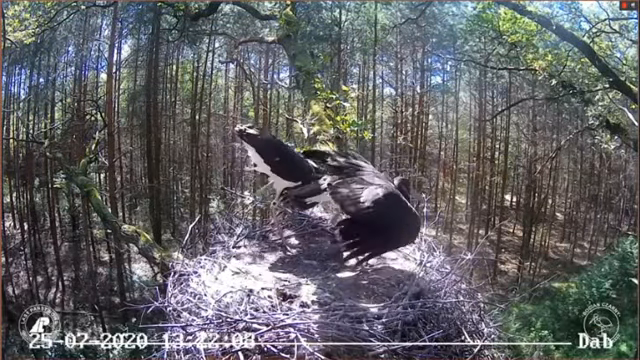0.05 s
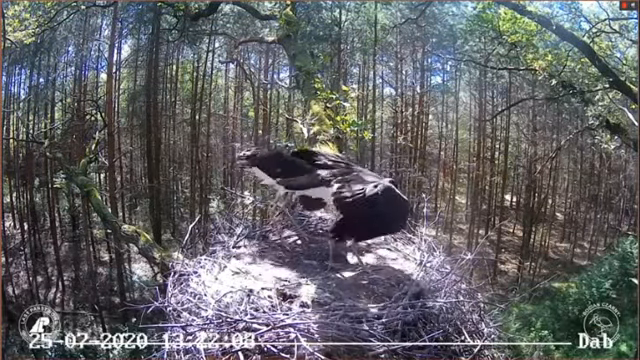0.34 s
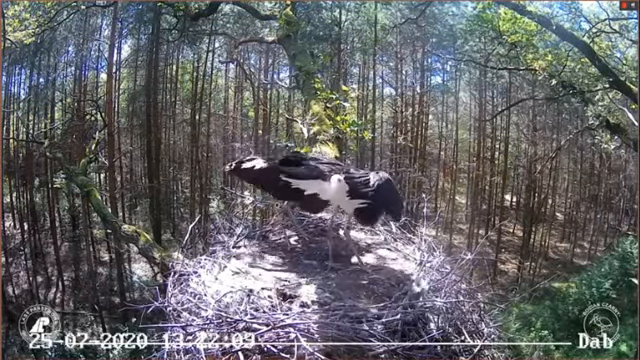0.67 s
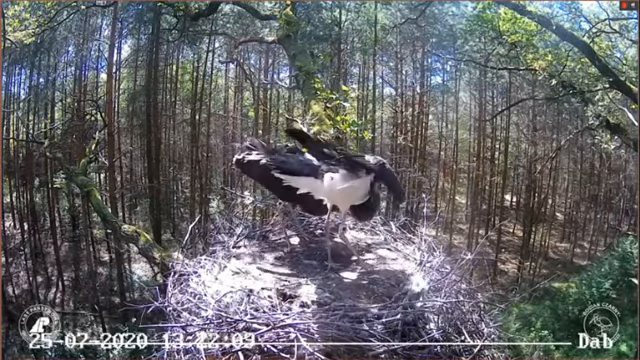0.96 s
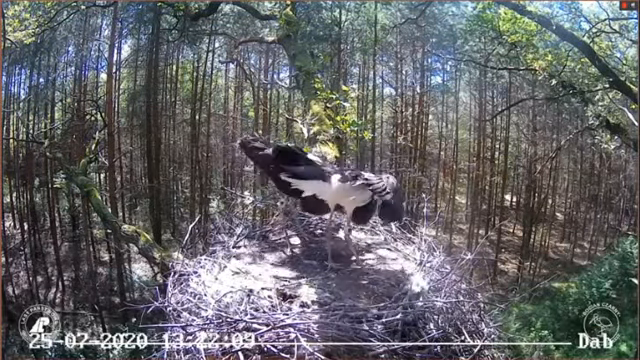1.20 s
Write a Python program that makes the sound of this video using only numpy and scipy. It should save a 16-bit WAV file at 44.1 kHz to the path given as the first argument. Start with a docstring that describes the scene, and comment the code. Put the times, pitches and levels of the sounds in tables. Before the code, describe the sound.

Harsh stork chatter, made of quick squeals, squeaks and breathy hiss, sounds from a forest nest. Soft outdoor hush and barely audible distant birds come first, then two bouts of calling, near the microphone and with a slight echo.

```python
"""Harsh chatter at a stork's nest: two bouts of about ten syllables a second, after a quiet forest opening.
Each syllable falls from thin squeaks through a squeal near 3 kHz, which breaks into subharmonics at a half
and a third of its pitch, sometimes down to a croak of pulses filtered by the throat. Turbulent air hisses
in the resonances of throat and bill. Feet shift on the nest, small birds call far off, and scattering
from the trees gives a short echo."""
import sys
import numpy as np
from scipy import signal
from scipy.fft import rfft, irfft
from scipy.io import wavfile

SR = 44100
rng = np.random.default_rng(int(sys.argv[2]) if len(sys.argv) > 2 else 0)


def dump(signal):
    """Clip the signal to [-1, 1] and save it as 16-bit WAV at the path in sys.argv[1]."""
    limited = np.clip(np.atleast_2d(signal).T, -1, 1)
    pcm = np.round(limited * 32767).astype(np.int16)
    wavfile.write(sys.argv[1], SR, pcm)


N = 176400
TIME = np.arange(N) / SR

# spectrum of the forest air: (frequency [Hz], spectral density [dB])
FOREST_SPECTRUM = [(30, -29.5), (75, -26.5), (150, -9.5), (400, -5), (750, 0.5), (1000, -3.5),
                   (1200, -12.5), (1550, -11.5), (3500, -18.5), (4900, -11.5), (5800, -24)]
# calls of small, distant birds: (middle [s], length [s], pitch [Hz], level [dB])
FAR_CALLS = [(0.073, 0.083, 5100, -68.5), (0.871, 0.069, 4740, -67), (1.482, .02, 4760, -64),
             (1.619, 0.075, 5000, -63.5)]
# reflections from nest and trunk: (delay [s], level [dB])
REFLECTIONS = [(.0031, -21.5), (.0068, -19.5)]
# stereo balance: (frequency [Hz], left minus right [dB])
BALANCE = [(2200, 0), (2900, -0.5), (3500, -1.5), (4300, -4.5), (5500, -1.5)]
# feet shifting on the nest: (middle [s], length [s], centre frequency [Hz], level [dB])
FOOT_SCUFFS = [(1.08, 0.05, 780, -64.5), (1.707, 0.018, 720, -67.5), (3.525, .02, 270, -46.5)]
# resonances of throat and bill: (frequency [Hz], half-width [Hz], gain [dB])
AIRWAY_MODES = [(714, 300, -13.5), (1030, 110, -8), (1650, 230, -11), (2640, 560, -7.5), (3250, 500, -1.5),
                (4300, 370, 5.5), (5200, 230, -2), (5500, 350, -9)]
# envelope of the hiss: (time [s], level [dB])
HISS_ENVELOPE = [(1.62, -92), (1.80, -61.5), (1.835, -51), (1.90, -54.5), (1.96, -51), (1.995, -48.5),
                 (2.02, -35), (2.06, -30), (2.125, -39.5), (2.155, -29), (2.18, -44.5), (2.22, -40),
                 (2.24, -25), (2.265, -30), (2.29, -25), (2.32, -32), (2.345, -26), (2.42, -27.5),
                 (2.495, -30.5), (2.525, -37.5), (2.56, -27.5), (2.595, -31), (2.66, -28.5), (2.77, -28.5),
                 (2.81, -31), (2.845, -39), (2.89, -28.5), (2.94, -44.5), (2.975, -33), (3.0, -40),
                 (3.05, -38.5), (3.10, -56), (3.15, -67), (3.275, -68), (3.325, -46), (3.35, -37.5),
                 (3.395, -31), (3.43, -38), (3.45, -36.5), (3.495, -36), (3.525, -31), (3.56, -32.5),
                 (3.64, -26), (3.675, -32), (3.71, -27.5), (3.80, -30), (3.855, -37), (3.88, -27),
                 (3.955, -33.5), (3.97, -27.5)]
# wandering squeaks within the hiss: (centre pitch [Hz], swing [fraction], relative level [dB])
HISS_WARBLES = [(4336, 0.049, -5.5), (5200, .035, -8), (3100, .09, -11)]
# lower throat resonances: (frequency [Hz], half-width [Hz], gain [dB])
LOW_FORMANTS = [(105, 200, -18.5), (442.5, 76, -4.5), (678.5, 130, 1.5), (961, 103, 3)]
# upper throat resonances: (frequency [Hz], half-width [Hz], gain [dB])
HIGH_FORMANTS = [(1480, 140, -4.5), (1646, 99, 1.5), (2450, 300, -6)]
# croaks: (middle [s], length [s], lowest pitch [Hz], level [dB], roughness [0-1], upper formants [dB])
CROAK_NOTES = [ (1.832, 0.012, 529.2, -28.5, 0.4, -1.5), (1.898, 0.015, 972, -39.5, 0.2, -11),
               (1.918, 0.0078, 453, -29.5, 0.5, -5.5), (1.934, 0.012, 498.6, -21, 0.35, -25),
               (2.033, 0.02, 326.6, -20.5, 0.3, -13.5), (2.127, 0.022, 342.3, -22, 0.4, -9),
               (2.223, 0.013, 365, -19, 0.5, -5), (2.316, 0.024, 1374, -25.5, .2, 7),
               (2.38, 0.033, 354, -24, 1, -3.5), (2.439, 0.055, 378, -32, 1, 0.5),
               (2.543, 0.016, 350.4, -22, 0.7, -0.5), (2.71, 0.037, 360, -34.5, 0.8, 3.5),
               (2.771, .010, 341.4, -28, 0.68, -25.5), (3.071, 0.018, 343.6, -21.5, 0.4, -5),
               (3.285, 0.0095, 360, -27.5, 0.7, -9.5), (3.3, 0.013, 401.2, -32, 0.5, 4.5),
               (3.373, 0.016, 520, -31.5, 0.4, -13.5)]
# squeaks: (middle [s], length [s], pitch [Hz], level [dB])
SQUEAK_NOTES = [ (2.053, 0.015, 4646, -22.5), (2.091, 0.011, 4496, -23.5), (2.102, 0.015, 4233, -22),
                (2.143, 0.0047, 4154, -22.5), (2.153, .014, 4300, -22), (2.290, 0.0093, 4300, -21),
                (2.504, 0.0087, 4027, -19), (2.557, 0.0096, 4200, -24), (2.56, 0.0045, 5456, -19.5),
                (2.574, .006, 3100, -20.5), (2.581, .010, 4700, -26.5), (2.609, 0.0056, 3250, -17),
                (2.616, 0.018, 4580, -25.5), (2.640, .008, 4410, -20), (2.69, 0.018, 4640, -25.5),
                (2.747, 0.0091, 4300, -25.5), (2.791, 0.0047, 4300, -24.5), (2.809, 0.013, 4184, -23),
                (2.911, .006, 3020, -15.5), (2.973, 0.0043, 4250, -21), (2.978, .007, 3100, -19.5),
                (3.020, .006, 4270, -21), (3.025, 0.0045, 3050, -15), (3.031, 0.0069, 4120, -18),
                (3.172, 0.043, 3200, -46), (3.307, 0.0069, 2376, -29), (3.341, .007, 2875, -22),
                (3.392, 0.0087, 4140, -22), (3.396, 0.0078, 5200, -21), (3.41, 0.0073, 4210, -21.5),
                (3.446, .008, 2990, -26), (3.452, .012, 4160, -21), (3.496, .008, 4225, -19),
                (3.503, 0.0077, 2880, -26), (3.507, 0.0067, 4160, -18.5), (3.539, .007, 4185, -20.5),
                (3.546, .006, 2847, -19), (3.553, .012, 4140, -19.5), (3.604, .010, 2260, -25),
                (3.651, 0.0044, 3016, -22), (3.655, .012, 4100, -24), (3.699, 0.0085, 3547, -17.5),
                (3.716, 0.02, 4406, -23.5), (3.808, 0.008, 2624, -24), (3.812, 0.022, 4380, -20.5),
                (3.83, 0.0085, 4300, -20), (3.876, .014, 4224, -20.5), (3.904, 0.014, 2600, -25),
                (3.916, 0.0047, 2996, -20.5), (3.935, .008, 4325, -22.5), (3.97, 0.014, 4360, -24.5)]
# squeals: (start [s], length [s], first pitch [Hz], last pitch [Hz], level [dB], roughness [0-1],
# relative level at half pitch [dB], relative level at third pitch [dB])
SQUEAL_NOTES = [ (1.927, .035, 3200, 2598, -35.5, .8, -5.5, -11),
                (2.004, 0.026, 3050, 2683, -18.5, 0.6, -31.5, -11.5),
                (2.101, .022, 3550, 3185, -21, .3, -27, -16),
                (2.188, .022, 4000, 3780, -29, .55, -29.5, -10.5),
                (2.297, 0.038, 3753, 3470, -21, 0.29, -22.5, -18.5),
                (2.404, .040, 3604, 3365, -25, 0.5, -28, -17),
                (2.517, .022, 3434, 3458, -19, 0.083, -12.5, -22),
                (2.622, .012, 3200, 3420, -20.5, 0.19, -10, -31),
                (2.704, .032, 3370, 3360, -19.5, 0.19, -22, -22),
                (2.815, .040, 3486, 2910, -34.5, 0.66, -7, -0.5),
                (2.921, .033, 3250, 2964, -19.5, 0.39, -19, -16),
                (3.035, 0.021, 3117, 3280, -21, 0.26, -16.5, -13),
                (3.351, .030, 3300, 3205, -21, 0.49, -32, -18.5),
                (3.453, .030, 3348, 2988, -20, 0.4, -12.5, -15),
                (3.555, .032, 3400, 3250, -23, 0.7, -8.5, -12),
                (3.589, .022, 3367, 3334, -22, 0.6, -16, -26),
                (3.617, .02, 2800, 4060, -22, 0.42, -26, -30),
                (3.663, 0.031, 3250, 3410, -19, .1, -17, -21.5),
                (3.771, .030, 3300, 3303, -22.5, .5, -12, -14.5),
                (3.879, .027, 3300, 3250, -22.5, 0.63, -18, -9),
                (3.98, .025, 3300, 3100, -21.5, 0.59, -22, -13.5)]

FLUTTER_HZ, SPLUTTER_HZ = 271.5, 90  # bandwidths of the random modulation of tones and of breath


def from_db(db):
    """Amplitude ratio of a level in decibels."""
    return 10 ** (np.asarray(db) / 20)


def unit_rms(x):
    """Normalisation to unit mean power."""
    return x / np.sqrt(np.mean(x ** 2) + 1e-20)


def colour(x, points):
    """Spectral shaping by a curve of (frequency [Hz], gain [dB])."""
    hz, db = np.transpose(points)
    bins = np.maximum(np.arange(N + 1) * SR / (2 * N), 1)
    gain = from_db(np.interp(np.log(bins), np.log(hz), db))
    return irfft(rfft(x, 2 * N) * gain)[..., :N]


def drift(corner_hz, size=8192):
    """Random fluctuation: low-passed noise of unit rms."""
    r = np.exp(-2 * np.pi * corner_hz / SR)
    return unit_rms(signal.lfilter([1], [1, -2 * r, r * r], rng.standard_normal(size)))


def resonate(x, modes):
    """Parallel resonators of alternating sign, each applied twice for deep valleys."""
    out = 0
    for k, (hz, half_width, db) in enumerate(modes):
        r = np.exp(-2 * np.pi * half_width / SR)
        section = [(1 - r * r) / 2, 0, (r * r - 1) / 2, 1, -2 * r * np.cos(2 * np.pi * hz / SR), r * r]
        out = out + (-1) ** k * from_db(db) * signal.sosfilt([section, section], x + 1e-18)
    return out


def note(length, edge_s, size=8192):
    """Time window centred in a buffer: position in the note (-1 to 1) and a soft-edged envelope."""
    t = (np.arange(size) - size // 2) / SR
    position = np.clip(2 * t / length, -1, 1)
    return position, .5 + .5 * np.tanh(2 * (length / 2 - np.abs(t)) / edge_s)


def add(out, middle, x):
    """Superposition of a buffer, centred on a time."""
    at = int(middle * SR) - len(x) // 2 + np.arange(len(x))
    inside = (at >= 0) & (at < N)
    out[at[inside]] += x[inside]


def oscillate(hz):
    """A sinusoid whose phase is the integral of its frequency."""
    return np.sin(2 * np.pi * np.cumsum(hz) / SR)


def whistle(length, edge_s, first_hz, last_hz, arch, rough):
    """A gliding, arched tone, roughened by the sidebands of frequency and amplitude modulation."""
    position, envelope = note(length, edge_s)
    glide_hz = first_hz + (last_hz - first_hz) * (position + 1) / 2
    arched_hz = glide_hz * (1 + arch * (1 / np.pi - position ** 2))
    hz = arched_hz * (1 + .06 * rough * drift(FLUTTER_HZ))
    rasp_hz = 520 * 2 ** (drift(FLUTTER_HZ) / 2)  # a second, uneven vibration
    rasp = 1 + .72 * rough * oscillate(rasp_hz)
    shimmer = from_db(9 * rough * np.tanh(drift(FLUTTER_HZ)))
    return envelope * unit_rms(oscillate(hz) * rasp * shimmer)


def forest_air():
    """Ambient noise: a steady spectrum whose level wavers slightly."""
    level_db = -66.5 + .4 * drift(corner_hz=5, size=N)
    return from_db(level_db) * unit_rms(colour(rng.standard_normal(N), FOREST_SPECTRUM))


def far_birds():
    """Thin calls of small birds, attenuated and blurred by distance."""
    out = np.zeros(N)
    for middle, length, hz, db in FAR_CALLS:
        add(out, middle, from_db(db) * whistle(length, length / 2, hz, hz, arch=0, rough=.71))
    return out


def near_echoes(x):
    """Early reflection: nest and trunk each return a delayed, weaker copy."""
    return sum(from_db(db) * np.pad(x, (int(delay * SR), 0))[:N] for delay, db in REFLECTIONS)


def tree_echo(x, t60_s=.32, delay_s=.0049, level_db=-12):
    """Reverberation: dense scattering from the trunks decays exponentially."""
    t = TIME[:SR]
    tail = rng.standard_normal(SR) * from_db(-60 * t / t60_s) * (t > delay_s)
    return from_db(level_db) * signal.fftconvolve(x, tail / np.sqrt(np.sum(tail ** 2)))[:N]


def steps():
    """Damped resonance: feet excite soft scuffs and a dull knock in the sticks of the nest."""
    out = np.zeros(N)
    for middle, length, hz, db in FOOT_SCUFFS:
        _, envelope = note(length, length / 2)
        sticks = resonate(rng.standard_normal(len(envelope)), [(hz, .54 * hz, 0)])
        add(out, middle, from_db(db) * envelope * unit_rms(sticks))
    return out


def hiss():
    """Turbulence excites throat and bill, each resonance flickering alone, amid broken squeaking."""
    air = 0
    for mode in AIRWAY_MODES:
        turbulence = rng.standard_normal(N) * from_db(5.5 * drift(SPLUTTER_HZ, N))
        air = air + resonate(turbulence, [mode])
    out = from_db(-2.5) * unit_rms(air)
    for centre_hz, swing, db in HISS_WARBLES:
        hz = centre_hz * (1 + swing * drift(corner_hz=70, size=N) + .025 * drift(FLUTTER_HZ, N))
        bursts = from_db(9.5 * np.tanh(drift(SPLUTTER_HZ, N)))
        out = out + from_db(db) * unit_rms(bursts * oscillate(hz))
    return from_db(np.interp(TIME, *np.transpose(HISS_ENVELOPE))) * out


def croaks(dip=.04987, jitter=.2):
    """Source and filter: uneven pulses that dip in pitch, with air noise, drive the throat's formants."""
    out = np.zeros(N)
    for middle, length, lowest_hz, db, rough, upper_db in CROAK_NOTES:
        position, envelope = note(length, .81 * length)
        hz = lowest_hz * (1 + dip * position ** 2) * (1 + jitter * rough * drift(corner_hz=150))
        cycles = np.cumsum(hz) / SR
        pulses = unit_rms(np.diff(np.floor(cycles), prepend=0))
        breath = rng.standard_normal(len(envelope))
        source = envelope * (np.sqrt(1 - rough ** 2) * pulses + rough * breath)
        voice = resonate(source, LOW_FORMANTS) + from_db(upper_db) * resonate(source, HIGH_FORMANTS)
        envelope_rms = np.sqrt(np.mean(envelope ** 2))
        add(out, middle - .002, from_db(db) * envelope_rms * unit_rms(voice))
    return out


def squeaks():
    """Register jumps: brief high notes as the voice flips up between squeals."""
    out = np.zeros(N)
    for middle, length, hz, db in SQUEAK_NOTES:
        add(out, middle, from_db(db - 1) * whistle(length, .46 * length, hz, hz, arch=.0147, rough=.46))
    return out


def squeals():
    """Period doubling and tripling: each syllable's core tone breaks to half, then a third of its pitch."""
    out = np.zeros(N)
    for start, length, first_hz, last_hz, db, rough, half_db, third_db in SQUEAL_NOTES:
        core = whistle(length, .004, first_hz, last_hz, arch=.02, rough=rough)
        add(out, start + length / 2, from_db(db) * core)
        for divisor, share_elapsed, relative_db in [(2, .3, half_db), (3, .75, third_db)]:
            hz = (first_hz + last_hz) / 2 / divisor
            subharmonic = whistle(.63 * length, .011, hz, hz, arch=.02, rough=.43)
            add(out, start + share_elapsed * length, from_db(db + relative_db) * subharmonic)
    return out


def scene():
    """Superposition of sources, echoes and forest air; a level difference leans the treble right."""
    direct = squeals() + squeaks() + croaks() + hiss() + steps() + far_birds()
    mono = direct + near_echoes(direct) + forest_air() + tree_echo(direct)
    return np.array([colour(mono, [(hz, side * db / 2) for hz, db in BALANCE]) for side in (1, -1)])


def record(dry, ceiling=.35, band_hz=5720, cutoff_hz=15700, tick_s=2.631):
    """Soft saturation and band limiting; a fizz that follows the treble and one tick exceed the band."""
    rounded = dry / (1 + (dry / ceiling) ** 4) ** (1 / 4)
    narrow = signal.sosfilt(signal.ellip(8, .3, 40, band_hz, fs=SR, output="sos"), rounded)
    treble_strength = np.abs(np.gradient(narrow, axis=-1))
    fizz = resonate(treble_strength * rng.standard_normal(N), [(band_hz, 940, -27.5)])
    tick = from_db(-13) * (np.arange(N) == int(tick_s * SR))
    return signal.sosfilt(signal.ellip(8, .1, 60, cutoff_hz, fs=SR, output="sos"), narrow + fizz + tick)


dry = scene()
out = record(dry)
dump(out)
```